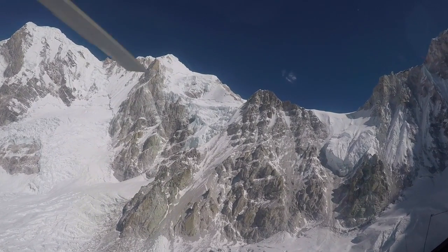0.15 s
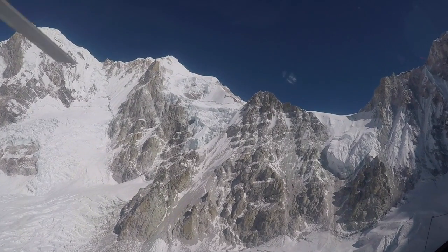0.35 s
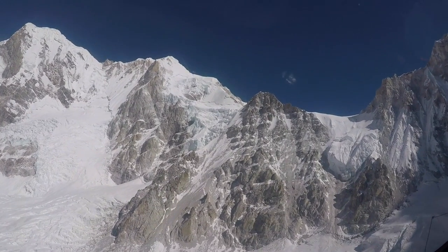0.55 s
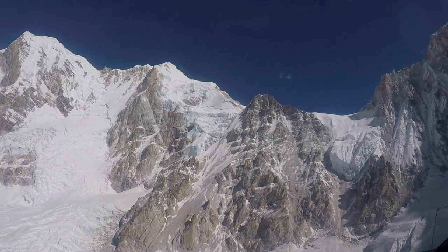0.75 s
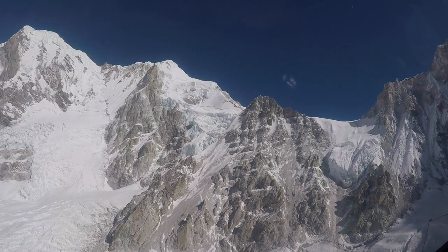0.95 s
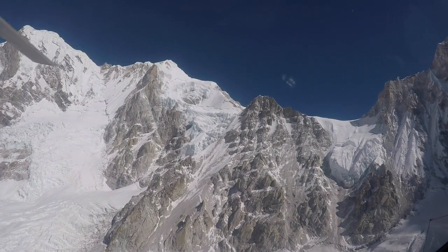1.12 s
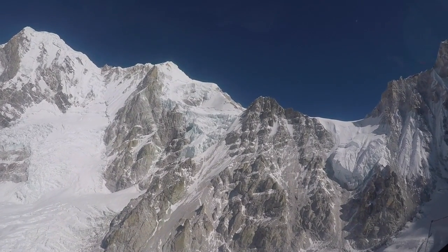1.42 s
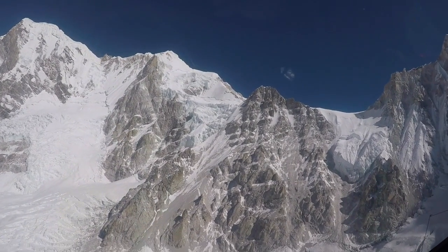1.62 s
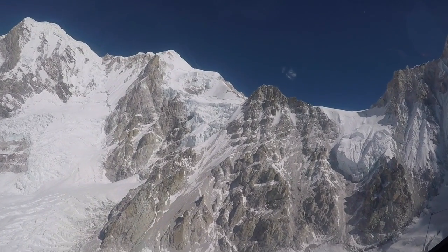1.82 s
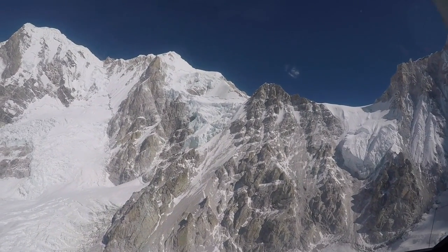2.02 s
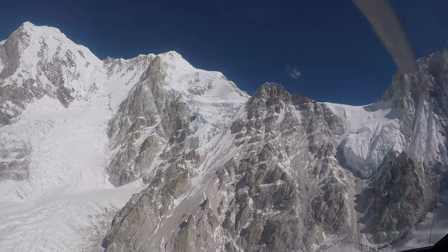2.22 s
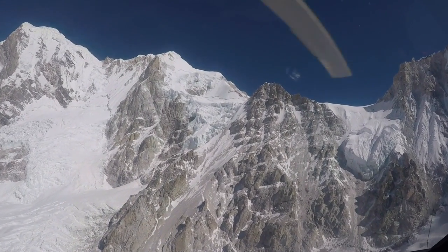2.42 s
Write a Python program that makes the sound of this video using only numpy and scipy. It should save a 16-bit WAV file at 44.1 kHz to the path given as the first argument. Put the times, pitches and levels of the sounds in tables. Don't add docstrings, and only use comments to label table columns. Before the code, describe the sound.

Helicopter drone in steady flight from inside the cabin, deep roar, fast throb and thin whine

```python
import sys
import numpy as np
from scipy import signal
from scipy.fft import rfft, irfft
from scipy.io import wavfile

SR = 44100
rng = np.random.default_rng(int(sys.argv[2]) if len(sys.argv) > 2 else 0)


def boost(x):
    u = np.asarray(x, float) / 20
    return 10 ** u


def int16_out(signal):
    q = np.round(np.clip(np.atleast_2d(signal).T, -1, 1) * 32767)
    wavfile.write(sys.argv[1], SR, q.astype(np.int16))


N = 112454

ROTOR_HZ, TAIL_HZ, DRIVE_HZ = 6.5034, 34.46, 101.18
THROB_TURN, BLADE_TURN = .4, .8


def sides(pan_db):
    gains = boost(np.array([pan_db / 2, -pan_db / 2]))
    return gains / np.sqrt(np.mean(gains ** 2, axis=0))


def drift(rate_hz):
    pole = np.exp(-80 * np.pi * rate_hz / SR)
    white = rng.standard_normal(N // 40 + 2002)
    slow = signal.lfilter([1], [1, -2 * pole, pole * pole], white)[2000:]
    slow = (slow - slow.mean()) / slow.std()
    return np.interp(np.arange(N) / 40, np.arange(len(slow)), slow)


def drive_time():
    # start_s, deviation_parts_per_10000
    governed_speed = [(0, 3), (.6, 1), (1.0, .5), (1.25, -1.2), (1.6, -.5), (1.95, 2), (2.25, -1),
                      (2.55, 0)]
    start_s, parts = np.transpose(governed_speed)
    deviation = np.interp(np.arange(N) / SR, start_s, parts) * 1e-4
    return np.cumsum(1 + deviation) / SR


def roar(time):
    # frequency_hz, density_db_per_hz
    roar_spectrum = [(10, -18.5), (50, -9.5), (95, -3.5), (200, -7), (650, -16), (1100, -28.5), (5300, -34),
                     (8500, -52)]
    # frequency_hz, left_minus_right_db, coherence_0_to_1, left_lead_rad
    port_response = [(40, .5, .97, .12), (100, 3.2, .99, .23), (250, 6.8, .95, .05), (500, 8.5, .8, -.9),
                     (900, -.5, .72, -1.85), (1400, -3, .25, -.5), (3800, .5, .45, .1),
                     (6000, -1.2, .2, -3)]
    # centre_hz, width_hz, lift_db
    cabin_modes = [(80, 20.5, 6), (158.5, 12, 3), (296, 58, 0), (612, 37, 6), (720, 60, -2.5)]
    blade_count, split_hz = 3, 750
    low_throb, high_throb, turn_throb = 0.14, 0.07, 0.017
    top_hz, top_db, top_drop_db = 10950, -8.5, -11.5
    roar_db, fade_db_per_s, patchy_db = -17.5, -0.67, .3
    hz = np.maximum(np.fft.rfftfreq(N, 1 / SR), 1)

    def at_hz(curve, column):
        points = np.array(curve)
        return np.interp(np.log(hz), np.log(points[:, 0]), points[:, column])

    blade = np.cos(2 * np.pi * (blade_count * ROTOR_HZ * time - BLADE_TURN))
    turn = turn_throb * np.cos(2 * np.pi * (ROTOR_HZ * time - THROB_TURN))
    high_share = 1 / (1 + (split_hz / hz) ** 4)
    spectra = 0
    for share, throb in ((1 - high_share, low_throb), (high_share, high_throb)):
        patches = boost(patchy_db * (drift(0.67) + drift(7.8)))
        gain = (1 + throb * blade + turn) * patches
        spectra = spectra + np.sqrt(share) * rfft(gain * rng.standard_normal((2, N)))

    above_top = 1 / (1 + (top_hz / hz) ** 80)
    octaves = np.log2(np.minimum(hz, top_hz) / roar_spectrum[-1][0])
    treble_db = top_db * np.clip(octaves, 0, 1) + top_drop_db * above_top
    cabin_db = 0
    for centre_hz, width_hz, lift_db in cabin_modes:
        cabin_db = cabin_db + lift_db / (1 + (2 * (hz - centre_hz) / width_hz) ** 2)
    common, own = spectra * boost(at_hz(roar_spectrum, 1) + treble_db + cabin_db)

    alike = np.clip(at_hz(port_response, 2), 0, 1)
    delayed = common * np.exp(-1j * at_hz(port_response, 3))
    right = (alike * delayed + np.sqrt(1 - alike ** 2) * own) * boost(-at_hz(port_response, 1))
    out = irfft(np.array([common, right]), N)
    return boost(roar_db + fade_db_per_s * time) * out / out[0].std()


def ticks():
    # start_s, peak_db, pitch_hz, left_minus_right_db
    housing_ticks = [
        (.565, -46, 9000, 0),
        (.802, -38, 10000, -1),
        (.802, -55, 12300, -1),
        (.9438, -28, 7100, -3),
        (.9438, -45, 10500, -3),
        (.9438, -56, 13000, -3),
    ]
    t60_s = .007
    out = np.zeros((2, N))
    t = np.arange(SR // 20) / SR
    for start_s, peak_db, pitch_hz, pan_db in housing_ticks:
        i = int(start_s * SR)
        ring = boost(peak_db - 60 * t / t60_s) * np.sin(2 * np.pi * pitch_hz * t)
        out[:, i:i + len(t)] += sides(pan_db)[:, None] * ring
    return out


def bumps():
    # centre_s, peak_db, pitch_hz, length_s, left_minus_right_db
    hand_bumps = [
        (1.882, -4, 58, .007, 1),
        (1.958, -10, 20, .016, 0),
        (2.324, -9, 46, .011, 0),
    ]
    t = np.arange(N) / SR
    out = np.zeros((2, N))
    for centre_s, peak_db, pitch_hz, length_s, pan_db in hand_bumps:
        bell = np.exp(-.5 * ((t - centre_s) / length_s) ** 2)
        swing = np.cos(2 * np.pi * pitch_hz * (t - centre_s))
        out -= sides(pan_db)[:, None] * boost(peak_db) * bell * swing
    return out


def shaft(time, shaft_hz, tones, level_db):
    out = np.zeros((2, N))
    turn = np.cos(2 * np.pi * (ROTOR_HZ * time - THROB_TURN))
    for multiple, tone_db, pan_db, lead_rad, throb in tones:
        angle = 2 * np.pi * (multiple * shaft_hz * time + rng.random())
        waver_db = .5 * drift(4.8)
        gain = np.sqrt(2) * boost(tone_db + level_db + waver_db)
        steady = sides(pan_db)[:, None] * np.sin(angle + [[lead_rad / 2], [-lead_rad / 2]])
        out += gain * (steady + throb * turn * np.sin(angle))
    return out


def gears(time):
    # shaft_multiple, rms_db, left_minus_right_db, left_lead_rad, turn_throb_depth
    drive_shaft_tones = [(1, -16, 3, .26, 0), (2, -40, 6, .33, 0), (1.0668, -26, 3, .26, 0),
                         (16.0063, -50, -7, -.9, 0), (16.7118, -51, 4, -.7, 0),
                         (16.9898, -35, -1, 1.43, .04), (33.9806, -59, 12, -.5, 0)]
    ring_gear_tones = [(100, -32, 9, -1.8, .05), (102, -46, 6, -1.3, 0), (104, -35, 8, -1.4, 0),
                       (200, -39, -3, 2.3, .45), (300, -53, 12, -.3, 0), (400, -42, -1, -.16, .07),
                       (495, -59, -3, 0, 0), (500, -42, 1, -.5, -.1), (501, -56, -2, -.5, 0),
                       (550, -60, -1, .1, 0), (600, -57, 4, .4, 0), (795, -56, 0, 2, 0),
                       (800, -51, -2, 2.3, 0), (805, -50, 11, 2.9, 0), (900, -61, -5, 2.4, 0),
                       (1616, -76, -10, -2.3, 0), (676, -60, 0, .3, 0), (1000, -66, 0, 0, 0),
                       (1095, -72, 0, 0, 0)]
    level_db = .4
    return shaft(time, DRIVE_HZ, drive_shaft_tones, level_db) + shaft(time, ROTOR_HZ, ring_gear_tones, level_db)


def rotors(time):
    # shaft_multiple, rms_db, left_minus_right_db, left_lead_rad, turn_throb_depth
    main_rotor_tones = [(3, -25, 0, .14, 0), (6, -32, 1, .22, 0), (9, -38, 3, .2, 0), (15, -31, 3, .25, 0)]
    tail_rotor_tones = [(1, -33, 0, .24, 0), (2, -21, 2, .23, 0), (4, -26, 4, .22, 0), (6, -27, 6, .2, 0),
                        (8, -37, 6, .17, 0), (14, -45, 12, -.2, 0)]
    return shaft(time, ROTOR_HZ, main_rotor_tones, 0) + shaft(time, TAIL_HZ, tail_rotor_tones, 0)


def scene():
    time = drive_time()
    return roar(time) + ticks() + bumps() + gears(time) + rotors(time)


def band_limit(x):
    return signal.sosfilt(signal.butter(12, 14020, fs=SR, output="sos"), x)


def record(dry):
    rounded = 1.213 * np.tanh(dry / 1.132)
    top_cut = signal.ellip(12, .5, 60, 13560, fs=SR, output="sos")
    mix = signal.sosfilt(top_cut, rounded) + .0017
    return band_limit(mix)


dry = scene()
out = record(dry)
int16_out(out)
```